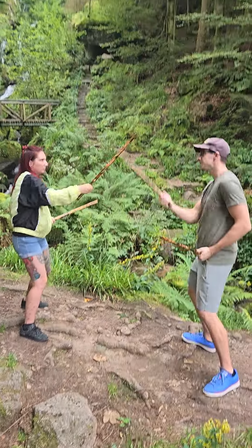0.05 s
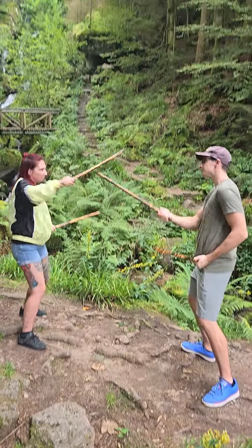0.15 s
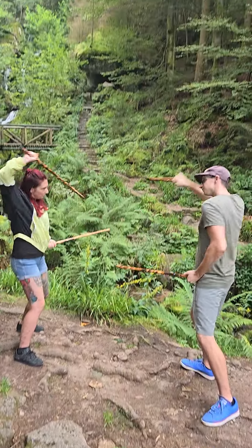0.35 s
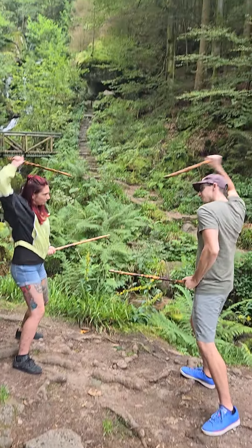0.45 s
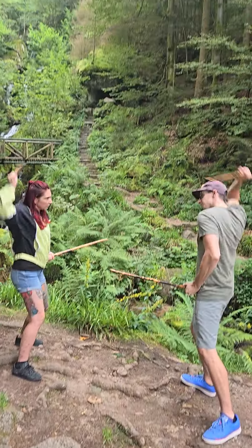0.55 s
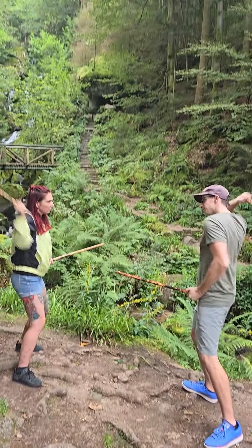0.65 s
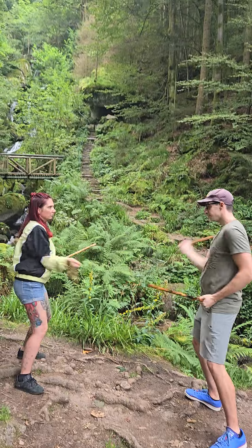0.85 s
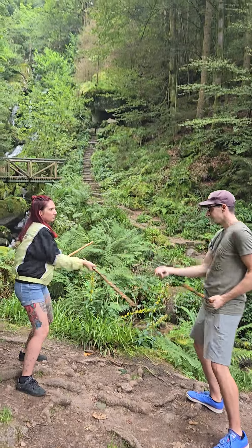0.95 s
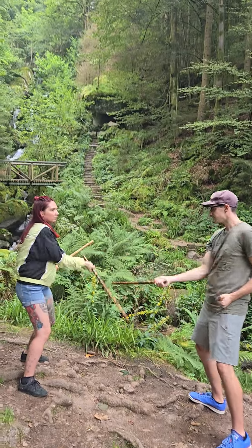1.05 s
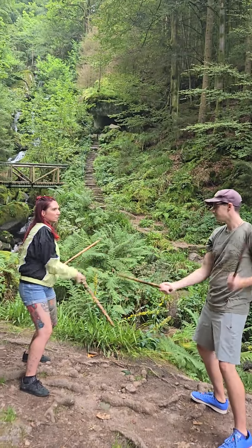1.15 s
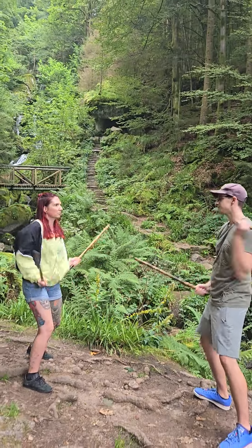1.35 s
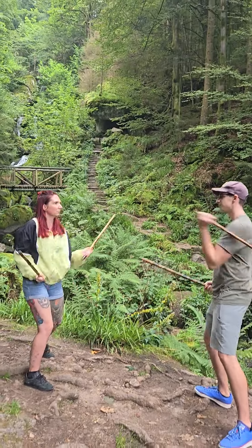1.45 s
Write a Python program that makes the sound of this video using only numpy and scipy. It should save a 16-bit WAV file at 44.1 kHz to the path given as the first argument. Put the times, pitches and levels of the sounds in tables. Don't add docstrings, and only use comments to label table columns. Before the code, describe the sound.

Two wooden sticks clack together twice outdoors in a forest, over a steady waterfall hiss.

```python
import sys
import numpy as np
from scipy import signal
from scipy.io import wavfile
from scipy.ndimage import uniform_filter1d, minimum_filter1d

SR = 44100
rng = np.random.default_rng(int(sys.argv[2]) if len(sys.argv) > 2 else 0)


def materialize(psi):
    bounded = np.clip(np.atleast_2d(psi).T, -1, 1)
    quanta = np.round(bounded * 32767).astype(np.int16)
    wavfile.write(sys.argv[1], SR, quanta)


def natural_amplitude(level_db):
    exponent = np.asarray(level_db, float) / 20
    return 10 ** exponent


N = 66150


def evened(x):
    return x / np.sqrt(np.mean(x ** 2) + 1e-20)


def read(points, hz):
    f, value = np.transpose(points)
    return np.interp(np.log(hz + 1), np.log(f + 1), value)


def add(mix, s, sound):
    part = mix[round(s * SR):][:len(sound)]
    part += sound[:len(part)]


# frequency in Hz, level in dB per Hz.
FALL_LEFT = [(40, -82), (200, -74), (750, -74.5), (1800, -83), (5500, -83), (8200, -88), (10000, -104),
             (13000, -87)]
FALL_RIGHT = [(40, -78.5), (200, -71.5), (900, -75), (3000, -80), (4500, -87.5), (7400, -83.5),
              (10700, -101), (12200, -90.5)]
# frequency in Hz, width in Hz, boost in dB.
PORT_RESONANCES = [(7314, 1030, 14.5), (2060, 700, 4)]
# knee in Hz, slope in dB per kHz.
PORT_DROOP = [(13600, -4.5), (12800, -2.5)]
# frequency in Hz, left-right correlation from 0 to 1.
PORT_LIKENESS = [(60, 0.69), (130, 0.94), (290, 0.93), (640, 0.86), (1410, 0.5), (3100, 0.04),
                 (6820, 0.076), (15000, 0.12)]


def waterfall():
    level_db, patch_db, swell_db = 16.5, 0.8, 0.25
    frames, hz = N // 256 + 5, np.fft.rfftfreq(1024, 1 / SR)
    a, b, c, d, patches = rng.standard_normal((frames, 513, 5)).T
    patches = uniform_filter1d(patches, size=10, axis=0)
    patches = evened(uniform_filter1d(patches, size=10, axis=1))
    swell = evened(uniform_filter1d(rng.standard_normal(frames), size=30))
    same = np.clip(read(PORT_LIKENESS, hz), -1, 1)[:, None]
    left = a + 1j * b
    right = same * left + np.sqrt(1 - same ** 2) * (c + 1j * d)
    colours = []
    ports = zip((FALL_LEFT, FALL_RIGHT), PORT_RESONANCES, PORT_DROOP)
    for fall, (centre_hz, width_hz, boost_db), (knee_hz, droop_db) in ports:
        resonance = boost_db / (1 + (2 * (hz - centre_hz) / width_hz) ** 2)
        droop = droop_db * np.maximum(hz - knee_hz, 0) / 1000
        colours.append(read(fall, hz) + resonance + droop)
    drift_db = patch_db * patches + swell_db * swell
    spectra = np.array([left, right]) * natural_amplitude(np.array(colours)[:, :, None] + drift_db + level_db)
    return signal.istft(spectra, nperseg=1024, noverlap=768)[1][:, :N]


# start in seconds, level in dB, pitch in Hz, share reaching the left port.
GUSTS = [
    (0.086, -55, 89, .1),
    (0.335, -33.5, 110, .1),
    (0.345, -36, 198, 0.089),
    (0.7387, -23, 123, .2),
    (0.7681, -26.5, 110, 0.1),
    (0.7866, -25, 114, 0.19),
    (0.9181, -29, 137, .1),
    (1.109, -38, 110, .1),
    (1.146, -43, 120, .1),
    (1.482, -40, 153, 0.092),
]


def wind():
    sag, decay_s, rise_s, left_lag_s, dip = 0.22, 0.0057, 0.0011, 0.002, 0.19
    out = np.zeros((2, N))
    t = np.arange(-130, 1800) / SR
    after = np.maximum(t, 0)
    fade = np.exp(-after / decay_s)
    for s, db, hz, left_share in GUSTS:
        turns = hz * after * (1 - sag + sag * fade)
        push = np.cos(2 * np.pi * turns) * fade * np.minimum(after / rise_s, 1)
        suck = dip * np.exp(-(t / rise_s + 0.5) ** 2)
        thump = 1.56 * natural_amplitude(db) * (push - suck)
        add(out[1], s + t[0], thump)
        add(out[0], s + t[0] + left_lag_s, left_share * thump)
    band = signal.butter(2, [45, 110], "band", fs=SR, output="sos")
    low = signal.sosfilt(band, rng.standard_normal((2, N)))
    lumps = uniform_filter1d(rng.standard_normal((2, N)), size=900)
    lumps = evened(uniform_filter1d(lumps, size=900))
    buffeting = evened(low * natural_amplitude(6 * lumps))
    return out + buffeting * natural_amplitude([[-66.5], [-61]])


def stick_ring(modes, contact_s):
    t = np.arange(SR // 8) / SR
    hz, left_db, right_db, t60 = np.transpose(modes)[:, :, None]
    t60 = np.clip(t60, 0.003, np.where(hz > 2200, 0.018, 1))
    sign = (-1.) ** np.arange(len(hz))[:, None]
    rings = sign * np.sin(2 * np.pi * hz * t) * natural_amplitude(-60 * t / t60)
    ports = np.array([(natural_amplitude(db) * rings).sum(0) for db in (left_db, right_db)])
    return ports * np.sin(np.pi / 2 * np.minimum(t / contact_s, 1)) ** 2


def contact_crack(crack_db):
    t = np.arange(SR // 8) / SR
    high = signal.butter(4, 10500, "high", fs=SR, output="sos")
    noise = signal.sosfilt(high, rng.standard_normal((2, len(t))))
    return noise * natural_amplitude(np.array(crack_db)[:, None] - 60 * t / 0.0028)


def single_echoes(echoes):
    taps = np.zeros((2, SR // 2))
    taps[:, 0] = 1
    t = np.arange(100)[:, None] / SR
    for delay, left_db, right_db in echoes:
        blur_s = max(0.0015 * min(delay / 0.01, 1) ** 2, 1e-5)
        rough = rng.standard_normal((100, 2)) * np.exp(-t / blur_s)
        add(taps.T, delay, natural_amplitude([[left_db, right_db]]) * rough / np.linalg.norm(rough, axis=0))
    return taps


def scatter(decay, rise_s):
    length, spacing = SR // 2, 20
    taps = np.zeros((2, length))
    at = np.arange(0, length - spacing, spacing) + rng.integers(0, spacing, (2, (length - 1) // spacing))
    np.put_along_axis(taps, at, rng.standard_normal(at.shape), 1)
    hz, t, z = signal.stft(taps, SR, nperseg=128)
    z = z * natural_amplitude(-60 * t / read(decay, hz)[:, None])
    tail = signal.istft(z, SR, nperseg=128)[1][:, :length]
    tail = tail * np.minimum(np.arange(length) / SR / rise_s, 1)
    return tail / np.linalg.norm(tail, axis=1, keepdims=True)


# frequency in Hz, t60 in seconds.
FOREST = [(1000, 0.31), (2500, 0.91), (4000, 0.78), (6000, 0.96), (9000, 0.58)]
# frequency in Hz, t60 in seconds.
SLOPE = [(2000, 0.12), (4000, 0.32), (6000, 0.17)]


def gorge(near_db, forest_db, slope_db):
    space = natural_amplitude(near_db) * scatter([(1, 0.085)], 0.0015)
    space = space + natural_amplitude(forest_db) * scatter(FOREST, 0.03)
    add(space.T, 0.062, natural_amplitude(slope_db) * scatter(SLOPE, 0.013).T)
    return space


# start at left port in seconds, level in dB, right port lag in seconds,
# near scatter in dB, forest in dB, far slope in dB.
BLOWS = [
    (0.2378, -2.5, .0003, -6, -14, -19.5),
    (1.1961, -6, .0001, -5.5, -14.5, -36),
]
# frequency in Hz, left in dB, right in dB, t60 in seconds.
MODES_FIRST = [(570, -34, -35, 0.034), (920, -31, -46, 0.045), (1480, -26, -29.5, 0.023),
               (2034, -20, -23.5, 0.033), (2210, -21.5, -0.5, 0.0088), (2650, -18, -4.5, 0.0081),
               (3236, -4.5, -12.5, 0.0074), (3910, -13, -9.5, 0.022), (4460, -17, -19, 0.0076),
               (4860, 0.5, -7.5, 0.0061), (5180, -1, -22.5, 0.0065), (5770, 1, -8, 0.0043),
               (6700, -17, -21, 0.015), (7280, -2.5, -19, 0.0043)]
MODES_SECOND = [(570, -30, -27, .05), (880, -29, -26, .05), (1600, -16, -10, .008), (1900, -13, -7, .009),
                (2250, -12, -8, .01), (2800, -6, -9, .008), (3400, -4, -5, .016), (3650, -8, -8, .01),
                (4700, -2, -10, .007), (5200, -4, -12, .007), (5700, -2, -9, .008), (6350, -9, -14, .008),
                (7350, -6, -12, .009), (8500, -26, -20, .008)]
# delay in seconds, left in dB, right in dB.
ECHOES_FIRST = [
    (.0028, -18, -18),
    (.0065, -17, -20),
    (.0103, -12, -18),
    (.0175, -19, -17),
    (.032, -28, -28),
    (.0745, -21, -26),
]
ECHOES_SECOND = [
    (.0017, -5, -9),
    (.0034, -20, -1),
    (.010, -17, -20),
    (.0177, -21, -17),
    (.045, -28, -30),
]
# left in dB, right in dB.
CRACK = [
    (-10, -25),
    (-22, -24),
]
CONTACT_S = (.0004, .0002)


def sticks():
    out = np.zeros((2, N))
    modes_of, echoes_of = (MODES_FIRST, MODES_SECOND), (ECHOES_FIRST, ECHOES_SECOND)
    blows = zip(BLOWS, modes_of, echoes_of, CRACK, CONTACT_S)
    for (s, db, right_lag_s, *room_db), modes, echoes, crack_db, contact_s in blows:
        ring = stick_ring(modes, contact_s)
        crack = contact_crack(crack_db)
        to_gorge = ring + 0.58 * ring[::-1] + natural_amplitude(5) * crack
        near = signal.fftconvolve(ring + crack, single_echoes(echoes), axes=1)
        far = signal.fftconvolve(to_gorge, gorge(*room_db), axes=1)
        left, right = natural_amplitude(db) * (near + far)
        add(out[0], s, left)
        add(out[1], s + right_lag_s, right)
    return out


def scene():
    return waterfall() + wind() + sticks()


def limiter(x):
    room = np.minimum(0.88 / (abs(x) + 1e-9), 1)
    return x * uniform_filter1d(minimum_filter1d(room, size=21), size=21)


def overload_tick(out):
    click = signal.firwin(101, [1500, 7800, 16500], fs=SR)
    add(out[0], 0.23787 - 50 / SR, click)


# port (0 left, 1 right), end in seconds,
# length in seconds, frequency in Hz, level in dB.
SMEARS = [
    (1, .2368, .019, 2100, -25),
    (0, .2365, .014, 7200, -34),
    (0, .2368, .007, 6000, -32),
    (0, 1.195, .01, 4700, -38),
    (0, 1.195, .012, 7300, -37),
]


def smears(out):
    for port, end, length, hz, db in SMEARS:
        t = np.arange(0, length, 1 / SR)
        wobble = 1 + 0.19 * evened(uniform_filter1d(rng.standard_normal(2000), size=100))[:len(t)]
        swell = np.sin(np.pi * (t / length) ** 1.1)
        add(out[round(port)], end - length, natural_amplitude(db) * wobble * swell * np.sin(2 * np.pi * hz * t))


def band_limit(x):
    return signal.sosfilt(signal.butter(12, 17050, fs=SR, output="sos"), x)


def record(dry):
    treble_edge = signal.firwin(401, 15750, window=("kaiser", 8), fs=SR)
    out = signal.oaconvolve(dry, treble_edge[None], "same")
    out = signal.sosfilt(signal.butter(2, 22, "high", fs=SR, output="sos"), out)
    out = limiter(out)
    overload_tick(out)
    smears(out)
    return band_limit(out)


dry = scene()
out = record(dry)
materialize(out)
```